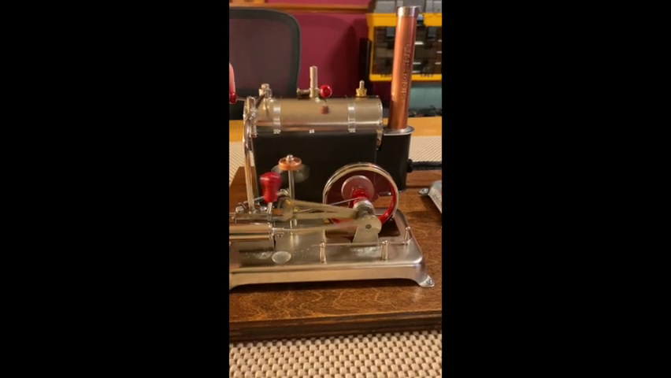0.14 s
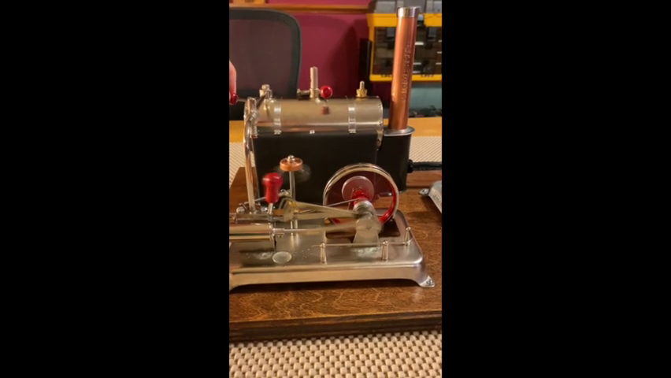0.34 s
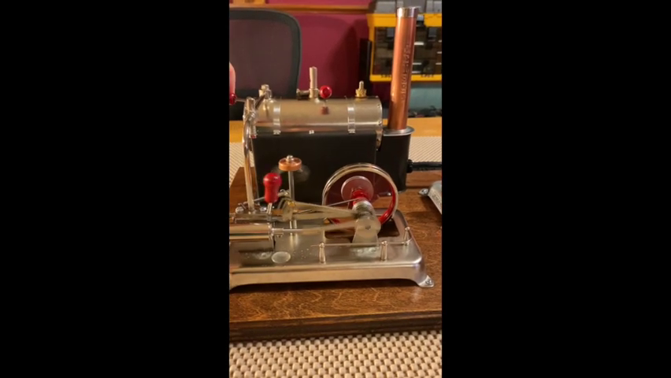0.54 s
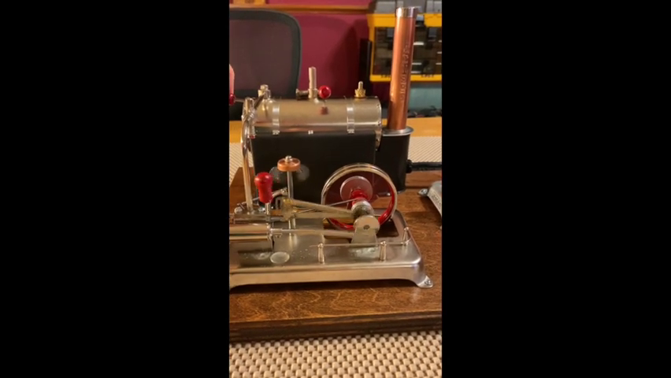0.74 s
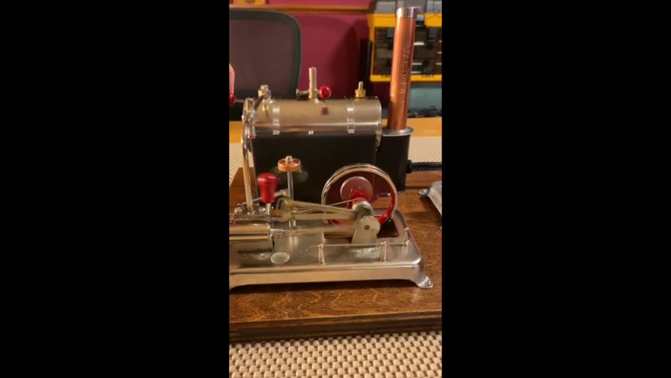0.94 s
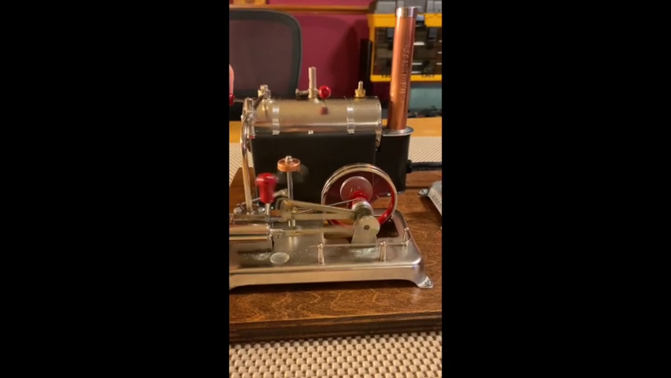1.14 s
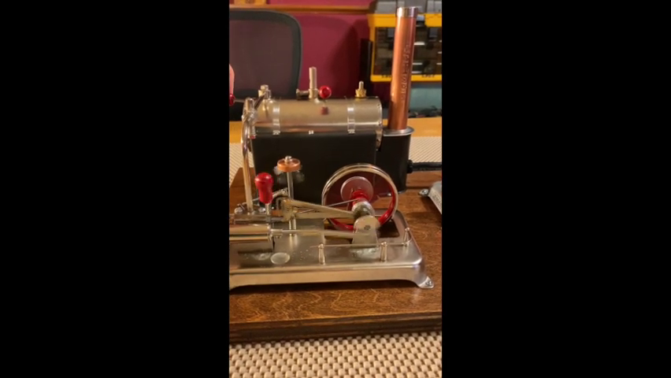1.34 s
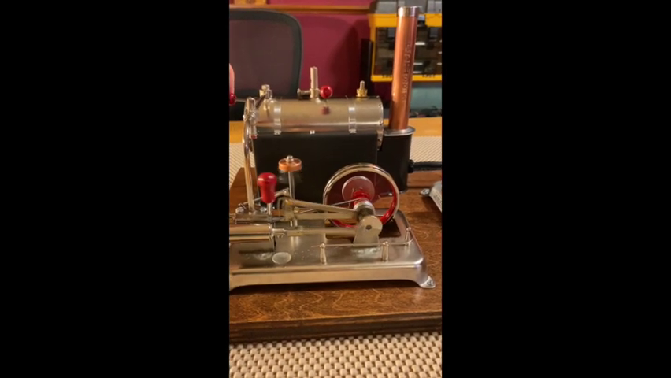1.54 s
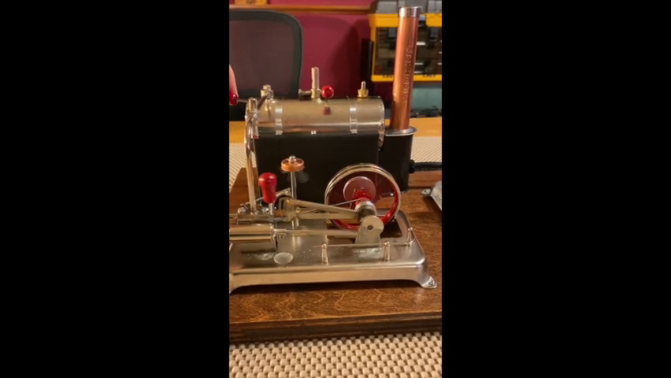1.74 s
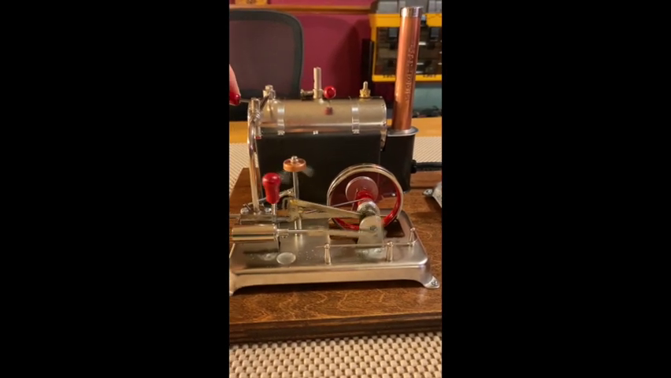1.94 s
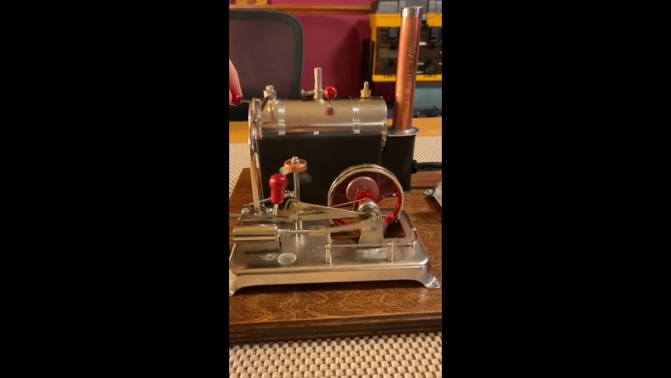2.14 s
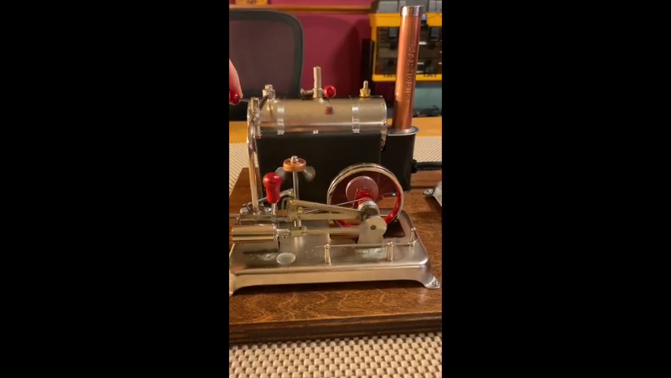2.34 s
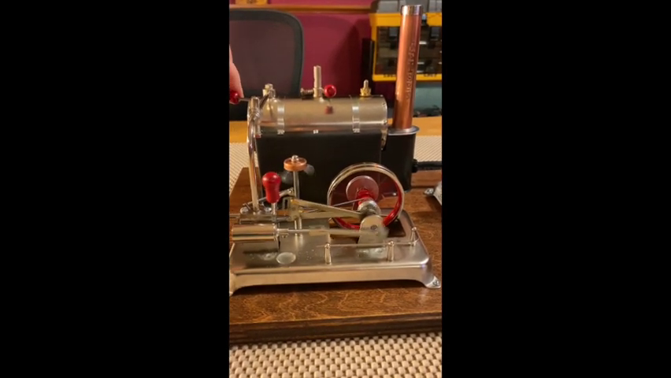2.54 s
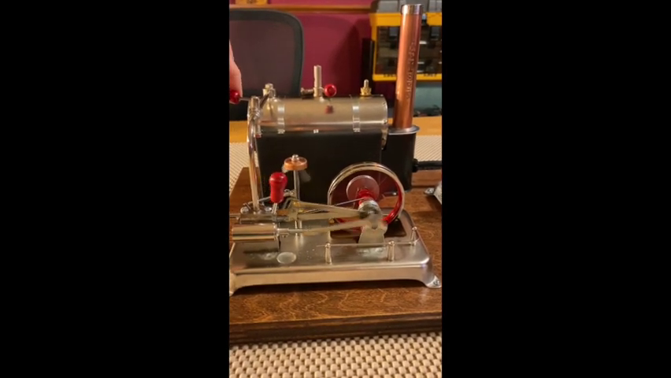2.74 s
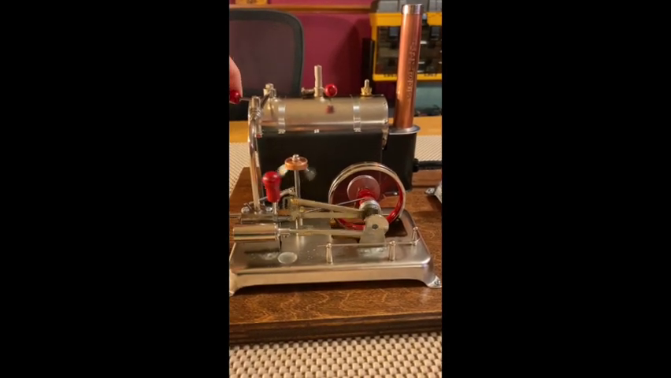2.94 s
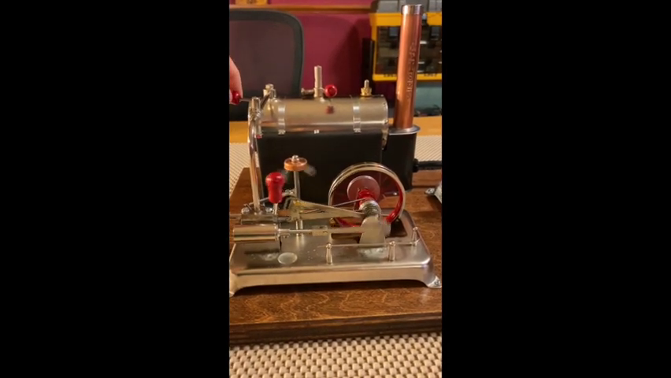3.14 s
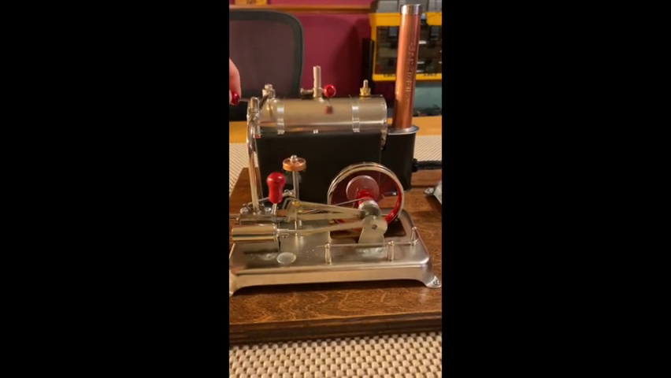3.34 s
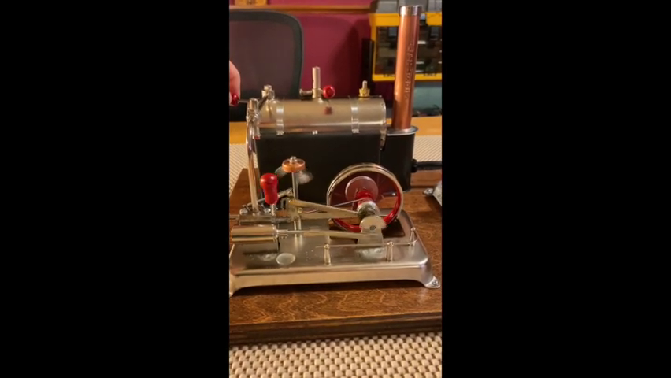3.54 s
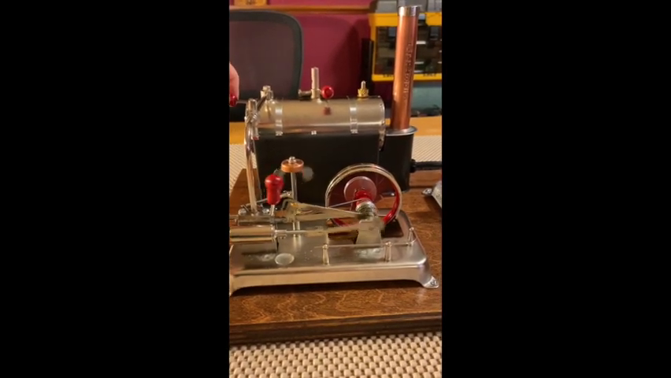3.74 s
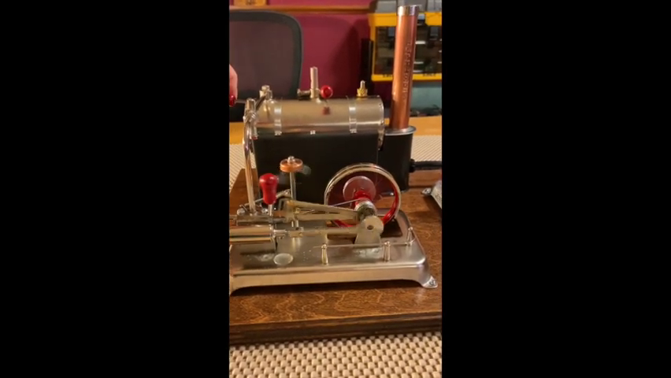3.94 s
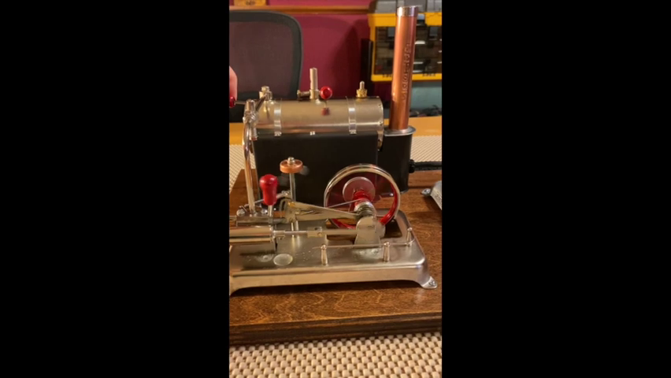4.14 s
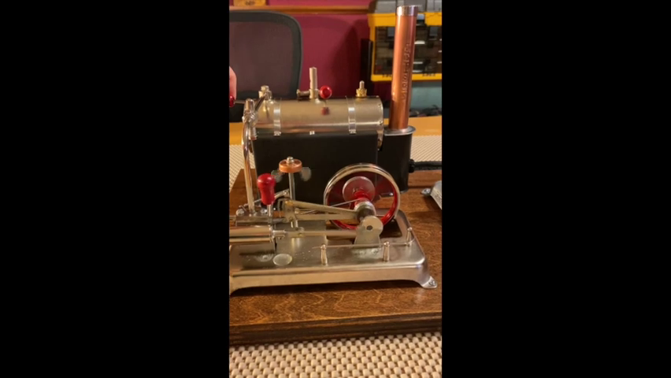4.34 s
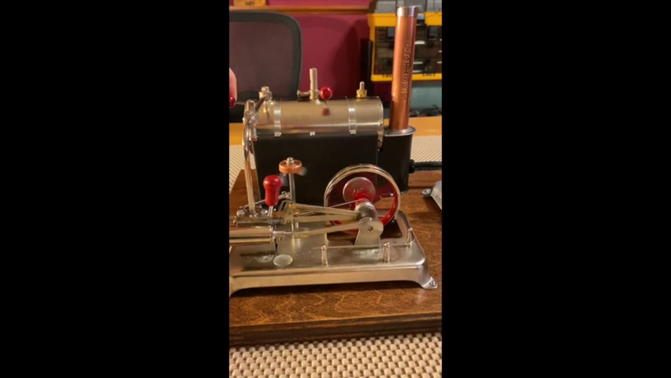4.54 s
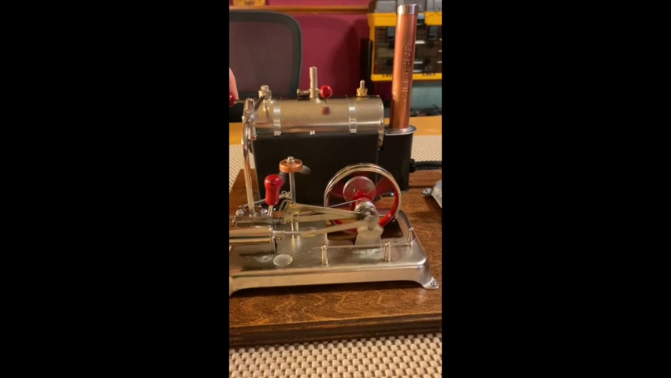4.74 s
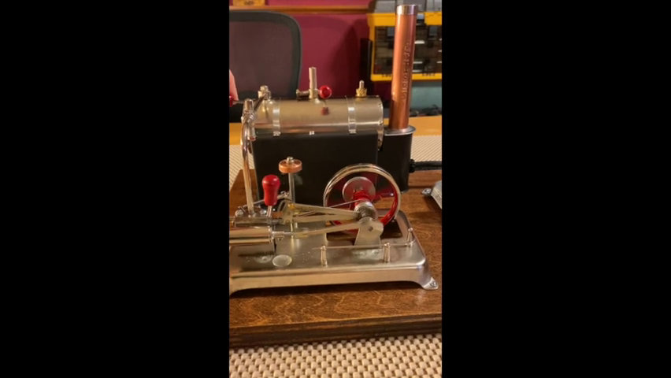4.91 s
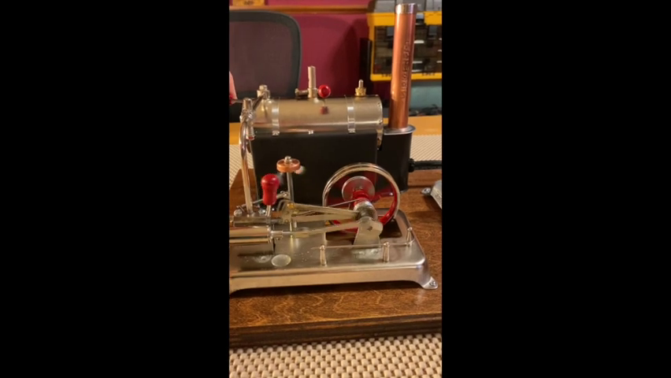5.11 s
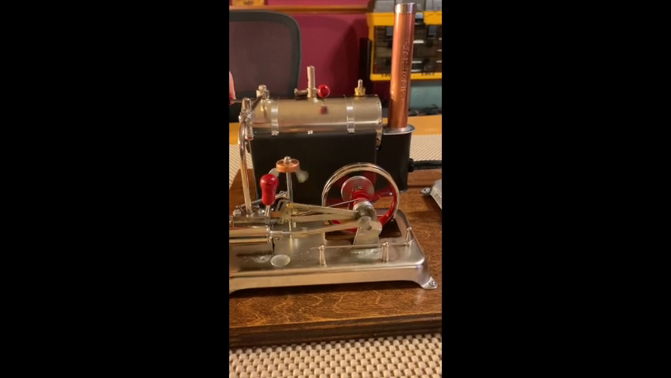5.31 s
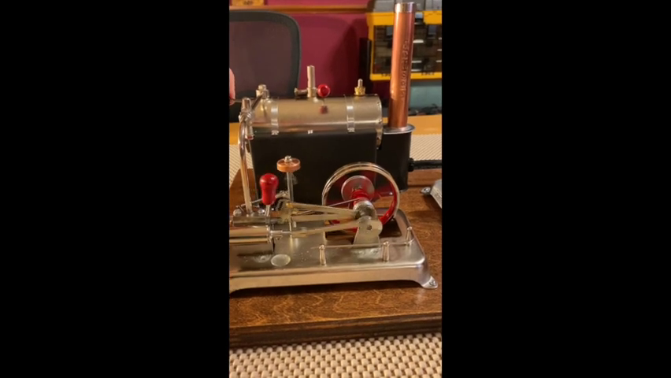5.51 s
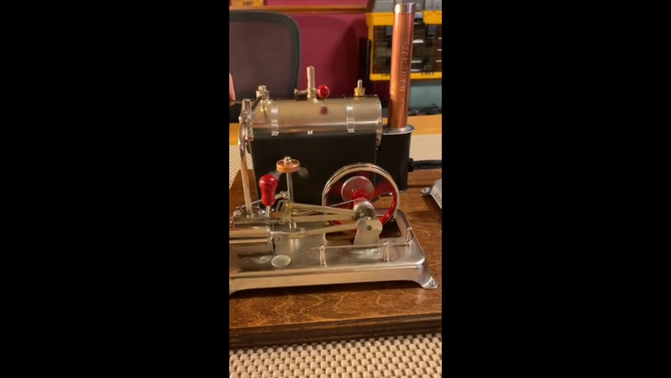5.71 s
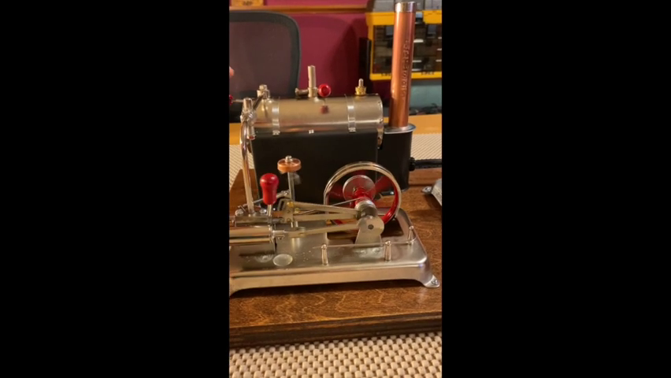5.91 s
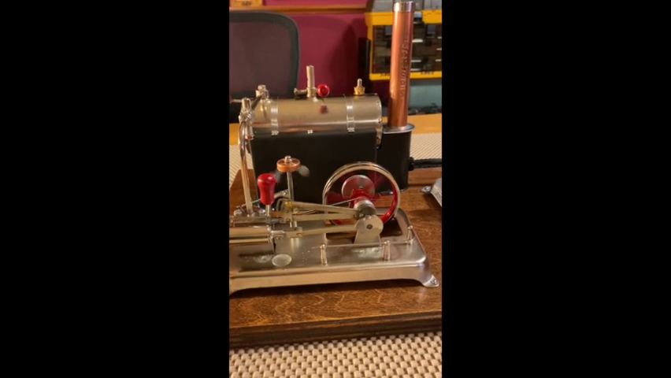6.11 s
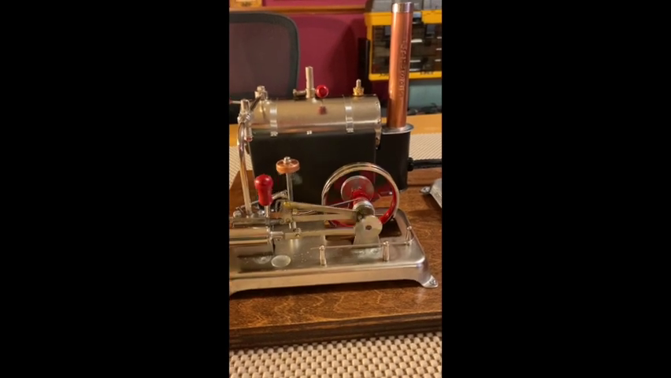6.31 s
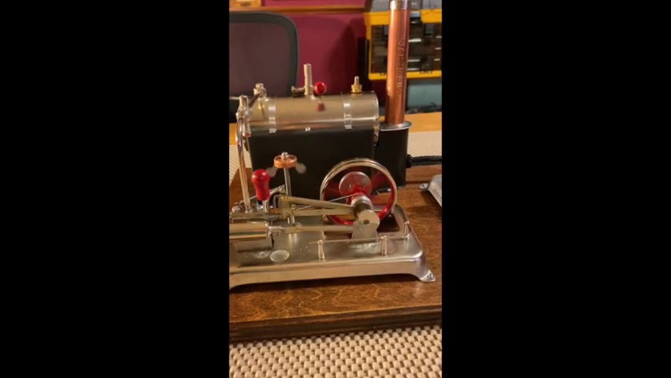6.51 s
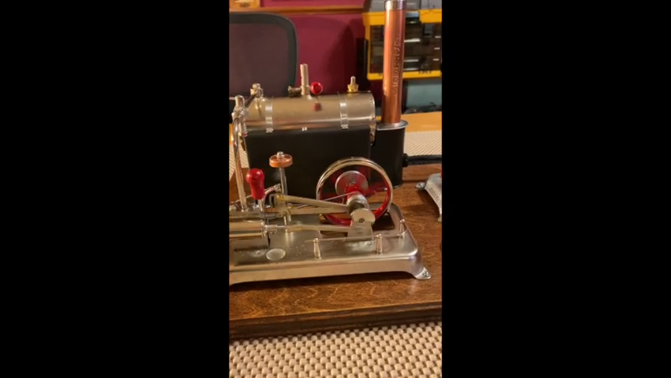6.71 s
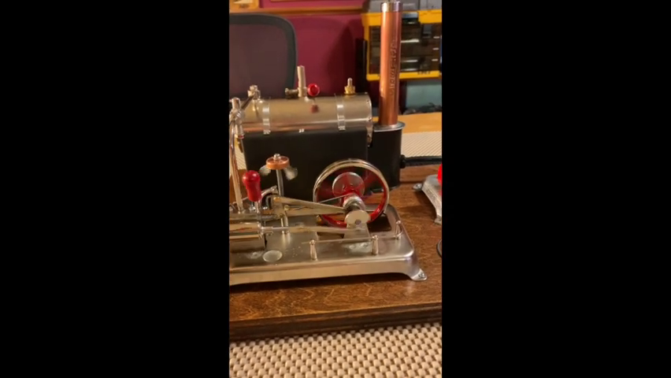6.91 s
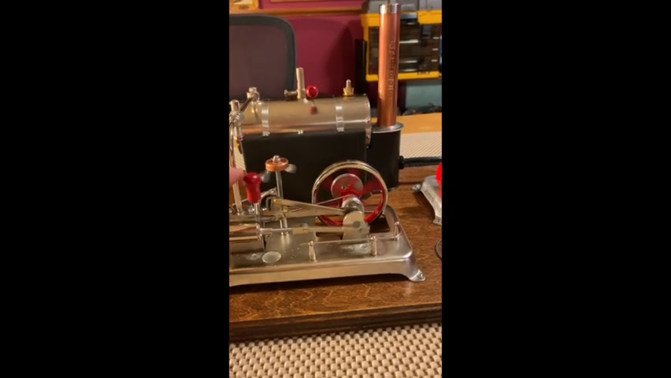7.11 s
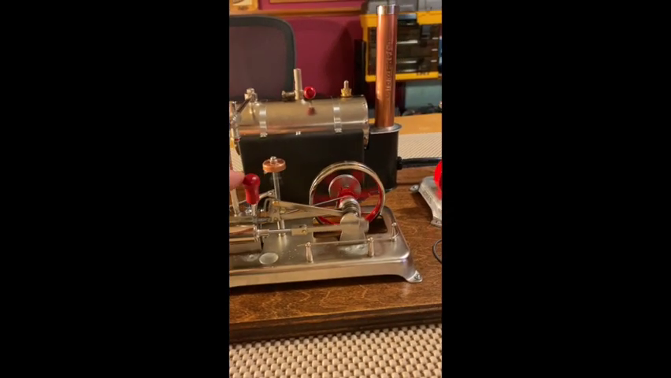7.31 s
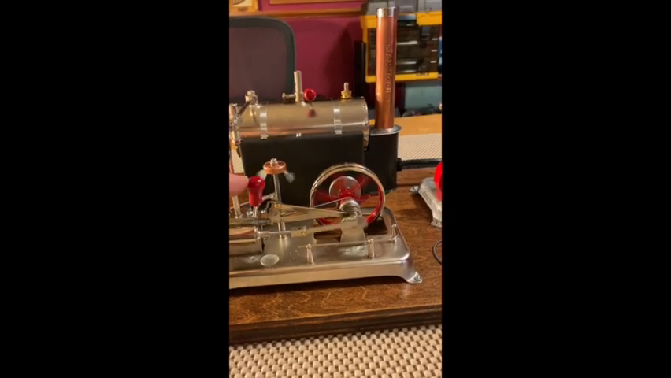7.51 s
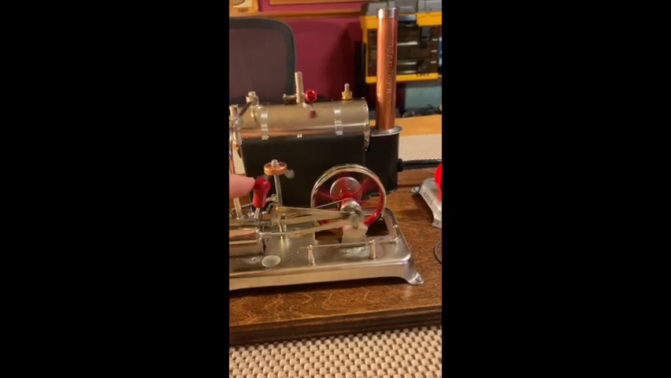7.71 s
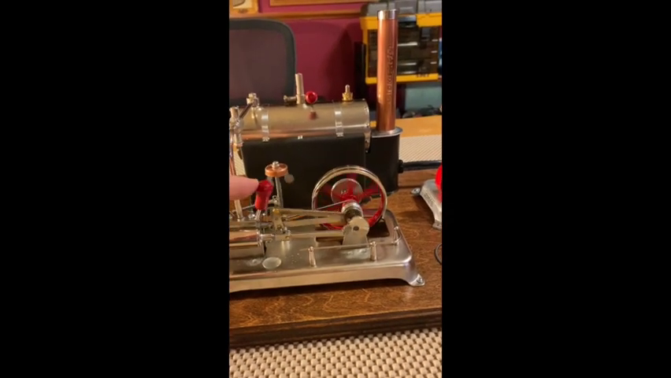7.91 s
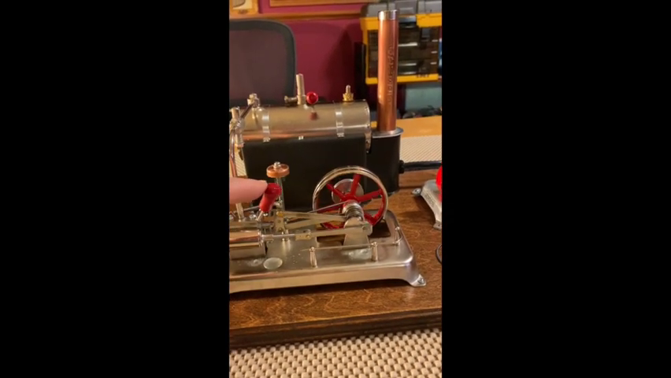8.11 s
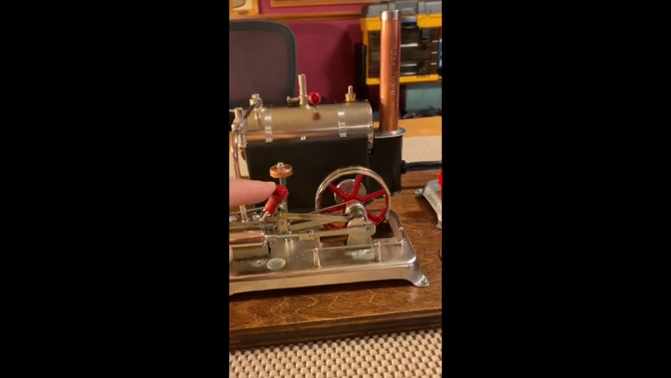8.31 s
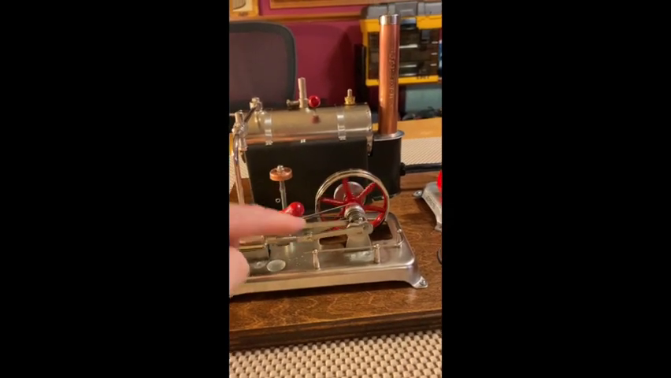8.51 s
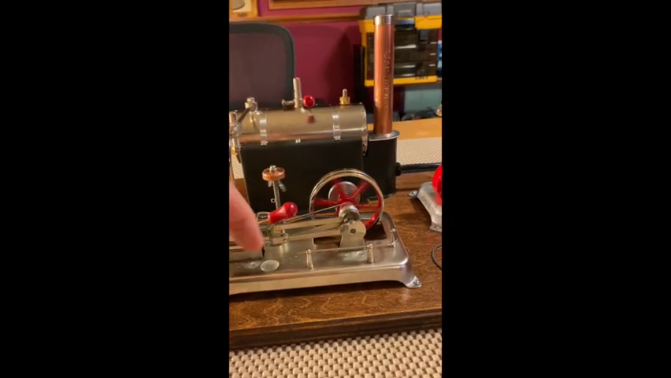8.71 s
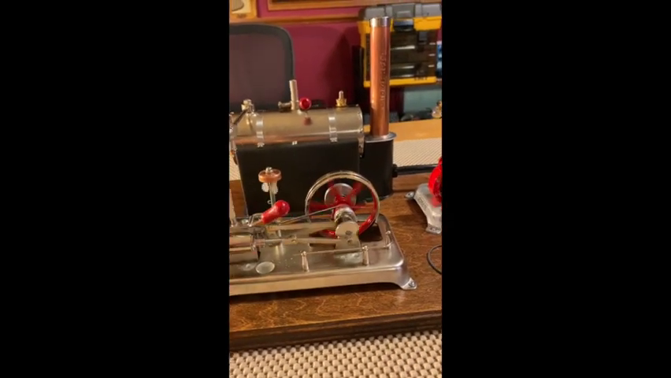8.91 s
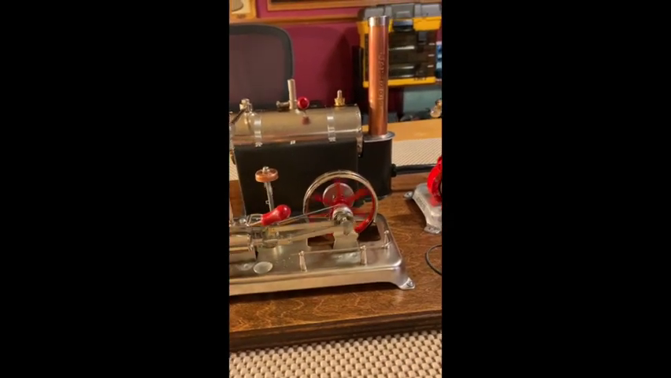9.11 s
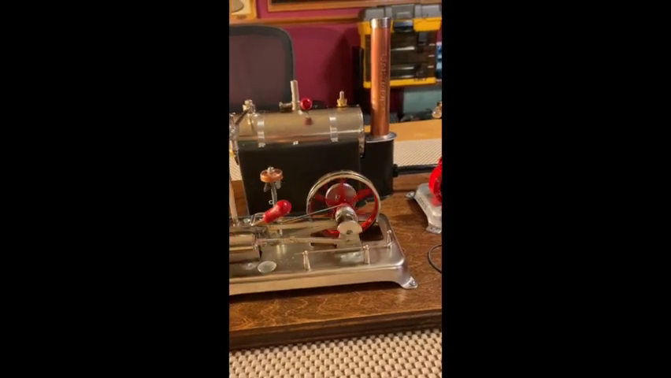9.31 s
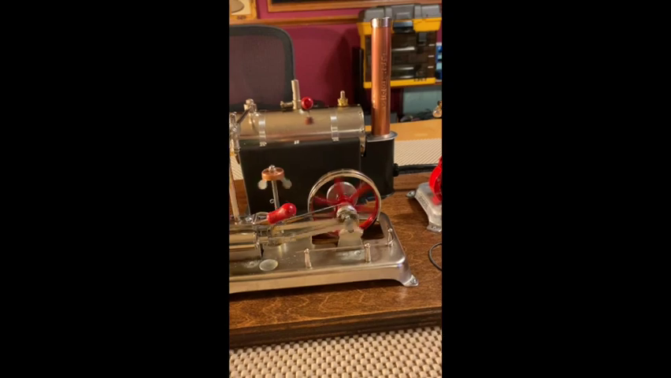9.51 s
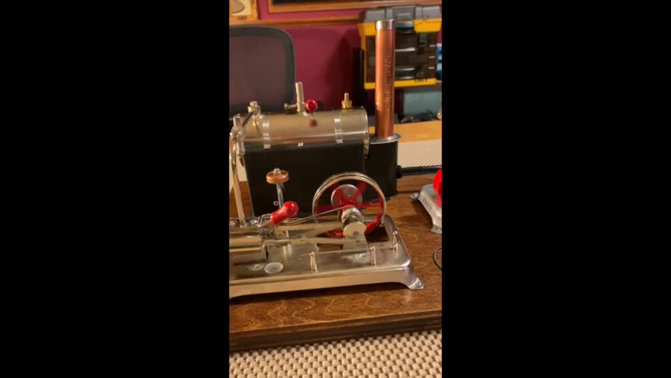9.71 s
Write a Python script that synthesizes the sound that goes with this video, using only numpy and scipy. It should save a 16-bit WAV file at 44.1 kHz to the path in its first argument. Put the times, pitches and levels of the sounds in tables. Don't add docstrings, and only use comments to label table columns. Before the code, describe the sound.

A model steam engine runs on a wooden table, heard close in stereo in a small, softly furnished room. From 0 to 1.3 s it is loudest: about twenty beats a second merge into a brassy, uneven clatter with sharp high puffs, leaking hiss and a water spit at the start. By 2 s it drops to roughly eight beats a second, steady until 4 s, each turn a woody knock, short puff and two bright valve ticks. From 4 to 5 s it slows again to about five, then gradually to four. Occasional droplets crack, notably around 6.4 s. At about 7.4 s a light tap comes as steam is shut off and the knocks quickly fade. At 8.4 s a lever snaps over with a loud metallic clack and low thump. Until about 9.75 s, faint ticks, brief bearing moans, breathy sighs and crisp wet spitting remain over table rumble and low hum.

```python
import sys
import numpy as np
from scipy import signal
from scipy.fft import rfft, irfft
from scipy.io import wavfile
from scipy.ndimage import uniform_filter1d

SR = 44100
rng = np.random.default_rng(int(sys.argv[2]) if len(sys.argv) > 2 else 0)


def elevation(decibels):
    levels = np.asarray(decibels, float)
    return 10 ** (levels / 20)


def master(y):
    cut = np.clip(np.atleast_2d(y).T, -1, 1)
    pcm = np.round(cut * 32767)
    wavfile.write(sys.argv[1], SR, pcm.astype(np.int16))


N = 429975
HZ, TIME = np.fft.rfftfreq(N, 1 / SR), np.arange(N) / SR


def noise():
    return rng.standard_normal(N)


def evened(x):
    return x / np.sqrt(np.mean(x ** 2) + 1e-20)


def read(points, hz):
    f, value = np.transpose(points)
    return np.interp(np.log(hz + 1), np.log(f + 1), value)


def coloured(x, spectrum):
    return evened(irfft(rfft(x) * elevation(read(spectrum, HZ)), N))


def ring(modes):
    t = np.arange(SR // 5) / SR
    return sum(elevation(db - 60 * t / t60) * np.sin(2 * np.pi * hz * t) for hz, db, t60 in modes)


def placed(s, blows):
    out = np.zeros(N + SR)
    for at, blow in zip(np.round(s * SR).astype(int), blows):
        out[at:at + len(blow)] += blow
    return out[:N]


def strike(s, db, modes, contacts, chatter_s, alike):
    t = np.arange(2048) / SR
    shape = sum(elevation(d) * np.maximum(t - late, 0) * np.exp(-abs(t - late) / chatter_s) for late, d in contacts)
    rough = rng.standard_normal((len(s) + 1, len(t)))
    alike = np.clip(alike, 0, 1)
    force = (alike * rough[:1] + np.sqrt(1 - alike ** 2) * rough[1:]) * shape
    blows = signal.fftconvolve(force, ring(modes)[None], axes=1)
    blows *= elevation(db)[:, None] / abs(blows).max(1, keepdims=True)
    return placed(s, blows)


def clink(s, db, modes, rise_s, scatter_db):
    t = np.arange(SR // 8) / SR
    hz, mode_db, t60 = np.transpose(modes)[:, :, None]
    phase, luck, tune = np.moveaxis(rng.random((len(s), len(modes), 1, 3)), -1, 0)
    swell = np.sin(np.pi / 2 * np.minimum(t / (2 * rise_s), 1)) ** 2
    shape = swell * elevation(mode_db - 60 * np.maximum(t - 2 * rise_s, 0) / t60)
    loudest = np.linalg.norm(shape, axis=0).max()
    detune = 0.022

    def blow(gain, a, b, c):
        waves = shape * elevation(scatter_db * (2 * b - 1.5))
        tones = np.sin(2 * np.pi * (hz * (1 + detune * (c - .5)) * t + a))
        return gain * (waves * tones).sum(0) / loudest

    return placed(s, (blow(*draw) for draw in zip(elevation(db), phase, luck, tune)))


def chatter(per_s, spread_db):
    hit, size, sign = rng.random(N), rng.exponential(1, N), noise()
    return (hit < per_s / SR) * elevation(spread_db * np.minimum(size, 4)) * sign


# t/s, shaking of base/dB, rattle of brass/dB, steam leak/dB, table rumble/dB
STEADY_LEVELS = [
    (0.0, -36, -38.5, -48, -49),
    (1.6, -46, -49.5, -75.5, -58.5),
    (7.79, -56, -64.5, -57, -57.5),
    (8.06, -54.5, -67, -63.5, -56.5),
    (8.22, -83, -68, -66.5, -58),
    (9.75, -56, -68, -57, -56.5),
]


def running(column):
    rows = np.array(STEADY_LEVELS)
    return elevation(np.interp(TIME, rows[:, 0], rows[:, column]))


# t/s, speed/(turns per s)
FLYWHEEL_SPEED = [(0, 22.468), (.3, 20.66), (1.05, 14.417), (1.25, 13.917), (1.45, 10.635), (1.9, 8.655),
                  (2.35, 8.107), (3.4, 8.129), (3.9, 8.047), (4.1, 7.604), (4.45, 5.985), (4.85, 5.229),
                  (5.3, 4.946), (7.35, 4.387), (8, 4.285)]


def crank(angle):
    start_turn, last_turn = -1.088, 65
    steam_off_s, fade_db_per_s = 7.39, 32
    speed = np.interp(TIME, *np.transpose(FLYWHEEL_SPEED))
    turned = start_turn + np.cumsum(speed) / SR
    s = np.interp(np.arange(-1, last_turn + 1) + angle, turned, TIME)
    return s, np.interp(s, TIME, speed), fade_db_per_s * np.maximum(s - steam_off_s, 0)


def law(table, speed):
    rows = np.transpose(table)
    return [np.interp(speed, rows[0], column) for column in rows[1:]]


# f/Hz, rms level/dB
HOUSE_HUM = [
    (91.5, -59),
    (177.6, -62),
]


def hum():
    drift = uniform_filter1d(rng.standard_normal((len(HOUSE_HUM), N)), 4000, axis=1)
    out = np.zeros(N)
    for (hz, db), d in zip(HOUSE_HUM, drift):
        cycles = np.cumsum(hz + 1.73 * evened(d)) / SR
        out += elevation(db - 1.0) * np.sqrt(2) * np.sin(2 * np.pi * cycles)
    return out


def flutter():
    slow = uniform_filter1d(uniform_filter1d(noise(), size=900), size=900)
    return elevation(3.5 * evened(slow))


# f/Hz, density/dB
LEAK_SPECTRUM = [(300, 23), (2000, 23.5), (3600, 11.5), (5700, 24.5), (7000, 15), (11800, -16), (13600, 24),
                 (16000, -24)]
# f/Hz, density/dB
RUMBLE_SPECTRUM = [(30, 2), (40, -9), (70, 4), (91, -5.5), (115, -2), (143, 1), (180, -9.5), (220, -6),
                   (700, -11), (1500, -22)]


def background():
    leak = [coloured(noise() + 0.69 * evened(chatter(900, 1.7)), LEAK_SPECTRUM) * flutter() for _ in range(2)]
    rumble = [coloured(noise(), RUMBLE_SPECTRUM) for _ in range(2)]
    return elevation(3.0) * running(3) * np.array(leak) + elevation(6.5) * running(4) * np.array(rumble) + hum()


# f/Hz, level/dB, t60/s
BASE_MODES = [(258, -8, 0.093), (391, -0.5, 0.069), (451.2, 9, 0.1), (501.5, 3.5, 0.098), (760, 9, 0.019),
              (870, 3, 0.063), (1036, 1, 0.084), (1158, 4.5, 0.039), (1330, 12.5, 0.015), (318, -3, 0.028),
              (141, -3, 0.13), (580, -23, 0.026), (668, -5, .04)]
# f/Hz, level/dB, t60/s
PLATE_MODES = [(1503, -0.5, 0.017), (1716, 3, 0.015), (1815, 8.5, 0.011), (2273, -6, 0.012),
               (3054, -7, 0.033), (3650, -13, 0.013), (4600, -7.5, 0.011), (5350, -33, 0.01),
               (6100, -10, 0.015)]
# f/Hz, level/dB, t60/s
LINK_MODES = [(3354, -2.5, 0.022), (3870, 4.5, 0.0052), (4025, -4.5, 0.06), (4800, 16.5, 0.001)]
# f/Hz, level/dB, t60/s
CYLINDER_MODES = [(5350, 2, 0.026), (5640, -0.5, 0.023), (6200, -28, 0.005), (6650, -10, 0.03)]


def rattle():
    base = elevation(10.5) * ring(BASE_MODES) + elevation(17.0) * ring(PLATE_MODES[:5])
    brass = elevation(5.5) * ring(LINK_MODES) + elevation(10.0) * ring(CYLINDER_MODES)
    low = signal.oaconvolve(chatter(2500, 3.04), base)[:N]
    high = signal.oaconvolve(chatter(1800, 2.56), brass)[:N]
    return elevation(-1.5) * running(1) * evened(low) + elevation(1.0) * running(2) * evened(high)


# start t/s, length/s, f/Hz, level/dB
BEARING_MOANS = [
    (8.533, 0.11, 743, -59),
    (8.83, 0.017, 1670, -51.5),
    (9.531, 0.035, 420, -48.5),
    (9.62, 0.044, 484, -51.5),
]


def moans():
    out = np.zeros(N)
    for s, length, hz, db in BEARING_MOANS:
        swell = np.sin(np.pi * np.clip((TIME - s) / length, 0, 1))
        out += elevation(db) * swell * np.sqrt(2) * np.sin(2 * np.pi * hz * TIME)
    return out


# t/s, level/dB
SIGH_EVENTS = [
    (7.94, -59),
    (8.04, -57),
    (8.779, -50),
    (9.009, -56),
    (9.238, -48),
    (9.619, -50.5),
]
# f/Hz, density/dB
OPENING_SPECTRUM = [(500, -7), (900, -11), (1150, 3), (1500, -12), (2100, -11), (3500, -19), (7000, -12),
                    (13000, -10)]
# f/Hz, density/dB
CLOSING_SPECTRUM = [(600, -18), (1100, -14), (1550, 14), (1900, -9), (2300, -19), (3200, -15), (7000, -17),
                    (13000, -12)]


def sighs():
    rise_s, fall_s = 0.0086, 0.02
    low, high = (coloured(noise() + .6 * evened(chatter(1500, 3.6)), spectrum)
                 for spectrum in (OPENING_SPECTRUM, CLOSING_SPECTRUM))
    out = np.zeros(N)
    for s, db in SIGH_EVENTS:
        u = np.clip(TIME - s + 0.021, 0, 1)
        climb = np.clip(u / 0.05, 0, 1)
        breath = (1 - np.exp(-u / rise_s)) * np.exp(-u / fall_s)
        out += elevation(db + 14.5) * breath * (np.sqrt(1 - climb) * low + np.sqrt(climb) * high)
    return out


# t/s, gland ring level/dB, wide crack level/dB
SPIT_EVENTS = [(0.014, -23, -27), (0.26, -37, -36), (1.38, -32, -58), (2.014, -31, -54), (2.069, -31, -47),
               (3.646, -36, -37), (3.974, -39, -34), (5.758, -36, -52), (6.411, -33, -26.5),
               (6.449, -34, -52), (7.292, -59, -36), (7.8, -37, -55), (8.167, -28, -26.5),
               (8.203, -34, -28), (8.348, -40, -29), (8.835, -27.5, -23.5), (8.877, -37, -39),
               (8.895, -29, -49), (9.124, -64, -31), (9.235, -29.5, -41), (9.281, -36, -46),
               (9.381, -22, -38), (9.407, -30, -26), (9.473, -34, -43), (9.518, -28, -34),
               (9.547, -34, -36), (9.572, -46, -30), (9.65, -28.5, -62), (9.701, -29, -49),
               (9.732, -24, -35)]
# f/Hz, level/dB, t60/s
GLAND_MODES = [(10750, 0, .018), (8600, -22, .02)]


def spits():
    s, ring_db, crack_db = np.transpose(SPIT_EVENTS)
    crack = [(14100, -3, 0.0026), (12100, 1, 0.0027), (8350, -3.5, 0.002), (4820, -38, 0.0041)]
    gland = strike(s, ring_db + 0.088, GLAND_MODES, [(0.0015, 0)], 0.00085, 0.09)
    return gland + strike(s, crack_db + 0.11, crack, [(0, 0)], 0.00097, 0.094)


# f/Hz, level/dB, t60/s
FRAME_CURVE = [(150, -8.5, 0.68), (454, 0, 0.2), (990, 6, 0.093), (3130, 19, 0.04), (4400, 19, 0.018),
               (5300, 4, 0.012), (7800, 25, 0.022), (12900, -19, 0.016), (15900, -14, .01)]


def frame_modes(count):
    hz = np.exp(rng.uniform(np.log(140), np.log(16000), count))
    f, db, t60 = np.transpose(FRAME_CURVE)
    return np.transpose([hz, np.interp(hz, f, db), np.interp(hz, f, t60)])


# f/Hz, level/dB, t60/s
LEVER_MODES = [(1310, -12, 0.035), (1755, -6, 0.028), (2220, -5.5, 0.021), (2690, -2, 0.016),
               (2940, -11, 0.025), (3530, -8, 0.016), (3680, -9, 0.0096), (4320, -12, 0.0082),
               (4880, -3, .01), (5450, -0.5, 0.015), (5800, 1, 0.016), (6900, -8, 0.0069),
               (12460, -6, 0.0079)]
# f/Hz, level/dB, t60/s
STAND_MODES = [(132, 1.5, 0.099), (178, 2.5, 0.085), (216, -7, 0.067), (267, 0, 0.073), (341, 2, 0.078),
               (453, -5.5, 0.28), (502, 1.5, 0.097), (610, -3, 0.034), (740, 5.5, 0.041), (850, 0, 0.03),
               (1057, -1.5, 0.049)]
# f/Hz, level/dB, t60/s
KNOB_MODES = [(746, -4, 0.1), (1150, -13, 0.033), (1370, -10, .05), (1545, -5, 0.046), (2340, -1, 0.055),
              (2750, 1, 0.044), (3530, -10, 0.047), (3670, -18, .02), (4030, -18, .02), (4270, -6, 0.024),
              (4860, -7, 0.019), (5200, -10, 0.027), (5750, -1.5, 0.037)]


def lever():
    contacts = [(0, -12), (.006, -15), (.012, -8), (.0185, 0), (.0215, 4.5), (.03, -4), (.04, -19)]
    shake = strike(np.array([8.378]), np.array([-14.5]), frame_modes(count=600), contacts, 0.0013, 0.4)
    touch = strike(np.array([7.416]), np.array([-30.0]), frame_modes(count=300), [(.0008, 0)], 0.0007, .4)
    snap = clink(np.array([8.3905, 8.397]), np.array([-34.0, -12.5]), LEVER_MODES, 0.00084, 0.9)
    thump_s, thump_db = np.array([8.383, 8.3995, 8.409, 8.425]), np.array([-37.0, -23.0, -33.0, -34.0])
    thump = clink(thump_s, thump_db, STAND_MODES, 0.0021, 0.65)
    tap_s, tap_db = np.array([7.4165, 7.916, 8.676]), np.array([-32.0, -40.5, -47.0])
    return shake + touch + snap + thump + clink(tap_s, tap_db, KNOB_MODES, 0.0017, 0.68)


PART_SCATTER_DB = 2.5
# speed/(turns per s), puff/dB, wooden base/dB, bed plate/dB, crank pin/dB
STROKE_LEVELS = [(4.31, -56.5, -25.5, -34, -36), (4.6, -47, -30, -32, -39.5),
                 (5.87, -52.5, -33, -37.5, -35), (7, -52, -29.5, -25.5, -36),
                 (7.73, -46.5, -30.5, -27, -34), (10, -46, -30, -34, -38), (12.1, -52, -54, -46, -42),
                 (13.3, -51, -44, -38, -40), (13.7, -45, -30, -35, -30), (15.9, -40, -33.5, -32.5, -41),
                 (18.3, -39, -40, -51, -52), (22.7, -35.5, -25, -32, -36)]
# f/Hz, density/dB
JET_SPECTRUM = [(2000, -27), (6500, -19), (7700, -7.5), (8600, -1.5), (10800, -5.5), (11900, -3),
                (13000, -12), (16000, -31)]


def puffs():
    s, speed, loss_db = crank(-0.052)
    db = law(STROKE_LEVELS, speed)[0] - loss_db + PART_SCATTER_DB * rng.standard_normal(len(s))
    turn_s = 1 / speed
    flow = np.zeros(N)
    for at, gain, width in zip(s, elevation(db + 4.5), 0.0016 + 0.029 * turn_s):
        part = slice(max(round((at - .1) * SR), 0), round((at + 0.12) * SR))
        u = (TIME[part] - at) / width
        trail = 0.14 * (u > 0) * np.exp(-abs(u) / 4.8)
        flow[part] += gain * (np.exp(-u ** 2 / 2) + trail)
    hoot = coloured(noise(), [(700, -15), (1100, -6.0), (1550, 0), (2100, -14), (3000, -16)])
    slow = np.interp(TIME, s, turn_s) / 0.22
    return flow * (coloured(noise(), JET_SPECTRUM) + elevation(-5.0) * slow * hoot)


# speed/(turns per s), first tick/turns, second tick/turns, rod float/turns
CRANK_ANGLES = [(4.4, .322, .705, 0), (5.2, .325, .708, 0), (8.1, .342, .7, 0), (9, .335, .66, 0),
                (13, .3, .655, 0), (14.5, .24, .55, .02), (19, .23, .51, .06), (22.5, .22, .49, .4)]
# speed/(turns per s), first link/dB, first chest/dB, second link/dB, second chest/dB
GEAR_PLAY = [(4.37, -33.5, -30, -39, -41.5), (4.97, -36, -31.5, -40.5, -43), (5.96, -37.5, -34.5, -37, -41),
             (8.05, -38, -31.5, -31.5, -37), (9.4, -36, -36.5, -32.5, -35), (11.5, -46, -47, -31, -27),
             (13.6, -37.5, -34, -33, -42), (19.3, -31, -27, -35, -39), (21.05, -48, -30, -23.5, -25.5),
             (23.3, -45, -29, -24, -27)]
# t/s, link level/dB, chest level/dB
STRAY_TICKS = [(7.332, -37, -35), (7.52, -37.5, -31.5), (7.641, -42, -38), (8.167, -51, -43),
               (8.207, -51, -50), (8.673, -50, -37), (8.835, -64, -48), (9.155, -45, -36.5),
               (8.93, -50, -46), (9.126, -48, -48), (9.357, -48, -54), (9.546, -58, -61), (9.727, -46, -47)]
# t/s, level/dB, lean from link to chest/dB
GEAR_FLAPS = [(0.0207, -17, -2), (0.0568, -24, -2), (0.0737, -27, -1), (0.1025, -20, 2), (0.1478, -20, 2),
              (0.1645, -21.5, -4), (0.2116, -20, -2), (0.2603, -17, 3), (0.3009, -21.5, 1), (0.348, -22, 1),
              (0.3963, -31, -4), (0.439, -28, -3), (0.4738, -38, 0), (0.4923, -22.5, 2), (0.5254, -33, -3),
              (0.545, -23.5, 4), (0.5813, -40, 0), (0.601, -23, 3), (0.6365, -25, 3), (0.674, -25, 0),
              (0.6934, -27, 4), (0.7138, -28, -1), (0.7316, -25.5, 0), (0.75, -39, -4), (0.8565, -32, -1),
              (0.9193, -33, -6), (0.9606, -28, 5), (0.9856, -31, -2), (1.0284, -25, 4), (1.1542, -21.5, 3),
              (1.1922, -31.5, -2), (1.2217, -30, 6), (1.2459, -26, 2), (1.27, -21, 4)]
# f/Hz, level/dB, t60/s
SLIDE_MODES = [(3375, -9.5, 0.028), (3527, -11.5, .008), (3772, 0, 0.015), (4003, -4, 0.019),
               (4450, -7, 0.012)]
# f/Hz, level/dB, t60/s
ECCENTRIC_MODES = [(1750, -2, 0.021), (3340, 7.5, 0.025), (3848, 1, 0.01), (4007, 4, 0.011),
                   (4500, -2, 0.012)]
# f/Hz, level/dB, t60/s
CHEST_MODES = [(2762, -4.5, 0.0032), (4700, -14, 0.0042), (4960, -6, 0.009), (5290, 9, 0.011),
               (5680, -6, 0.02), (6054, 0.5, 0.011), (6600, -4, 0.0048), (7280, -4, 0.01)]


def ticks():
    scatter_db, flap_until_s = 1.2, 1.33
    gear_fade_share = 6.5
    fling_from, fling_slope_db = 13.8, 1.26
    brass = np.zeros(N)
    for k, (angle, link) in enumerate(zip(law(CRANK_ANGLES, crank(0)[1]), (SLIDE_MODES, ECCENTRIC_MODES))):
        s, speed, loss_db = crank(angle)
        db = np.array(law(GEAR_PLAY, speed))[2 * k:2 * k + 2] - gear_fade_share * loss_db
        db += scatter_db * rng.standard_normal((len(s), 2)).T
        db[:, s < flap_until_s] = -120
        fling_db = k * fling_slope_db * np.maximum(speed - fling_from, 0)
        brass += k * clink(s - .003, db[0] - 14.0 + fling_db, SLIDE_MODES[1:], 0.00057, PART_SCATTER_DB)
        db[0] -= .5 * fling_db
        strays = STRAY_TICKS * (1 - k)
        s, link_db, chest_db = np.transpose(list(zip(s, *db)) + strays)
        brass += clink(s - .001, link_db - 2.0, link, 0.0023, PART_SCATTER_DB)
        brass += clink(s - .001, chest_db + 0.4, CHEST_MODES, 0.0021, PART_SCATTER_DB)
        base_db = np.maximum(link_db, chest_db) - 10.0
        brass += strike(s, base_db, BASE_MODES[1:4], [(.004, 0)], 0.0016, 0.77)
    s, db, lean_db = np.transpose(GEAR_FLAPS)
    brass += clink(s - .001, db - 5.5 - lean_db, SLIDE_MODES, 0.0017, PART_SCATTER_DB)
    brass += clink(s - .001, db - 7.0 + lean_db, CHEST_MODES, 0.0015, PART_SCATTER_DB)
    return brass + strike(s, db - 14.5, BASE_MODES[1:4], [(.004, 0)], 0.0019, 0.3)


# f/Hz, level/dB, t60/s
WOOD_MODES = [(263, -11, 0.032), (320, -8, 0.036), (378, -5, 0.047), (457, -8, 0.046), (494, -7.5, 0.068),
              (610, -2.5, 0.019), (707, -4.5, 0.027), (750, -0.5, 0.034), (854, -0.5, 0.035),
              (930, -9, 0.0066), (1072, -4.5, 0.028), (1196, -3, 0.026), (1340, -12, 0.0093)]
# t/s, level/dB
EXTRA_KNOCKS = [
    (1.468, -30.5),
    (1.894, -30),
    (8.034, -45.5),
]


def knocks():
    speed = crank(0)[1]
    luck_db = 1.2 * rng.standard_normal((len(speed), 3))
    uneven = 1 + .5 * np.sin(2.4 * np.arange(len(speed)))
    s, speed, loss_db = crank(law(CRANK_ANGLES, speed)[2] * uneven)
    base_db, plate_db, pin_db = luck_db.T + law(STROKE_LEVELS, speed)[1:] - loss_db
    low_plate = PLATE_MODES[:4]
    out = clink(s - .0005, plate_db, low_plate, 0.0018, PART_SCATTER_DB)
    out += clink(s + 0.0043, plate_db - 8.5, low_plate, 0.00069, PART_SCATTER_DB)
    for late, db in [(.0015, -0.5), (.007, -5.5), (.02, -11.5)]:
        out += clink(s + late, base_db + db, WOOD_MODES, 0.0015, PART_SCATTER_DB)
    out += clink(*np.transpose(EXTRA_KNOCKS), WOOD_MODES, 0.0028, PART_SCATTER_DB)
    out += strike(s, base_db - 6.0, WOOD_MODES + low_plate, [(.001, -5), (.008, -4.5)], 0.0026, 0.33)
    return out + clink(s - .0005, pin_db, PLATE_MODES[3:], 0.0016, PART_SCATTER_DB)


def scattered(x, t60):
    t = np.arange(SR // 4) / SR
    tail = rng.standard_normal(len(t)) * elevation(-60 * t / t60)
    return signal.oaconvolve(x, tail / np.linalg.norm(tail))[:N]


# f/Hz, lead/rad
PORT_LEAD = [(0, 0), (520, -.3), (860, .35), (2050, .3), (2700, 1.25), (3200, 1.5), (4000, .65),
             (4500, 1.3), (5700, 1.15), (7000, 2.7), (8600, 3.1), (11000, 3.3), (12700, 3.9), (14300, 5.6),
             (16000, 6.2)]
# f/Hz, difference/dB
PORT_TILT = [(60, -.3), (170, -1.8), (690, -4), (1050, -.8), (1850, .6), (2400, -3.2), (4500, -1.5),
             (6500, .5), (9000, 0)]
# f/Hz, coherence from 0 to 1
PORT_LIKENESS = [(60, .999), (300, .985), (900, .86), (1750, .95), (2500, .7), (3400, .65), (5500, .85),
                 (6500, .7), (8500, .94), (11000, .92), (13400, .5), (15500, .75)]


def scene():
    engine = rattle() + moans() + sighs() + spits() + lever() + puffs() + ticks() + knocks()
    dull = signal.sosfilt(signal.butter(2, 3500, fs=SR, output="sos"), engine)
    engine += elevation(-7.5) * scattered(dull, 0.29) + elevation(-11.0) * scattered(engine, 0.1)
    engine = signal.sosfilt(signal.butter(2, 190, "highpass", fs=SR, output="sos"), engine)
    sway = [np.sqrt(2 / 3) * np.cos(2 * np.pi * (2.3 * TIME + k / 3)) for k in range(3)]
    smear = sum(scattered(w * engine, 0.029) for w in sway)
    near, other = rfft(background() + [engine, smear])
    like = np.clip(read(PORT_LIKENESS, HZ), 0, 1)
    share, rest = np.sqrt((1 + like) / 2), np.sqrt((1 - like) / 2)
    port = elevation(read(PORT_TILT, HZ) / 2) * np.exp(.5j * read(PORT_LEAD, HZ))
    left = (share * near + rest * other) * port
    right = (share * near - rest * other) / port
    return irfft(np.array([left, right]), N)


def low_pass(x):
    return signal.sosfilt(signal.butter(12, 15900, fs=SR, output="sos"), x)


def record(dry):
    cut = signal.sosfilt(signal.butter(2, 45, "highpass", fs=SR, output="sos"), dry)
    return low_pass(cut)


dry = scene()
out = record(dry)
master(out)
```